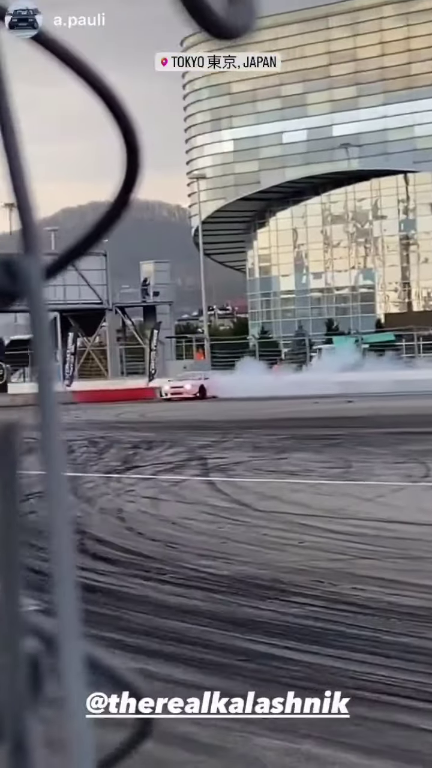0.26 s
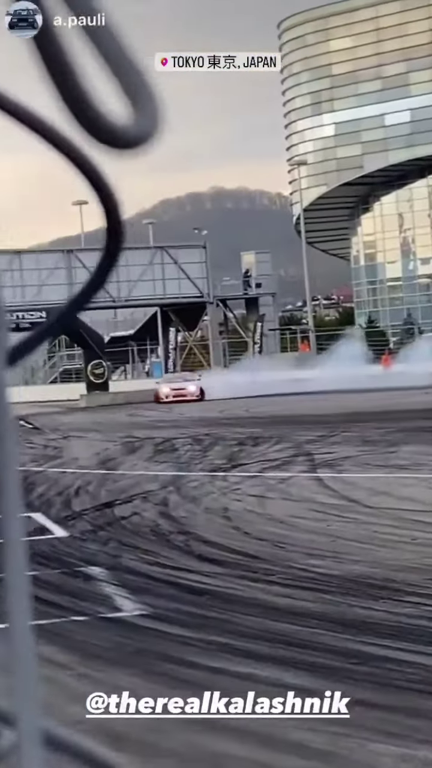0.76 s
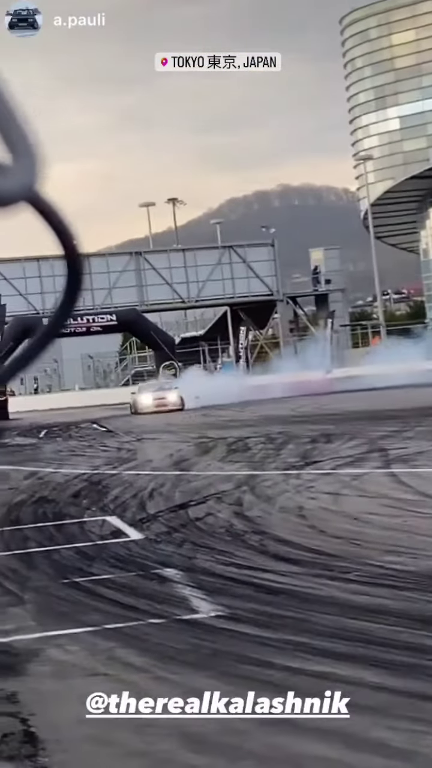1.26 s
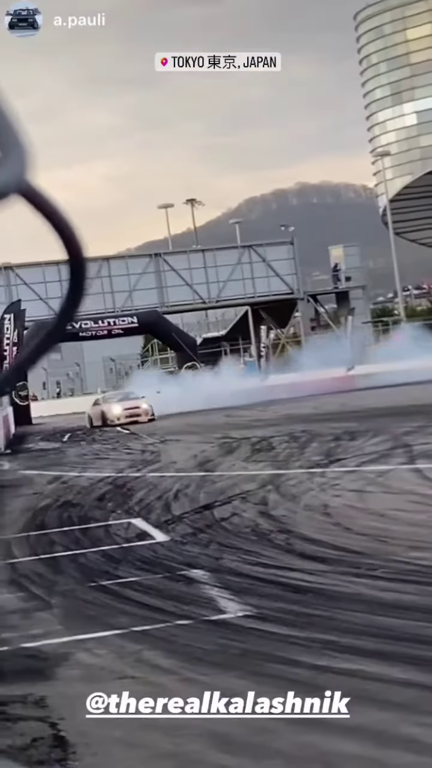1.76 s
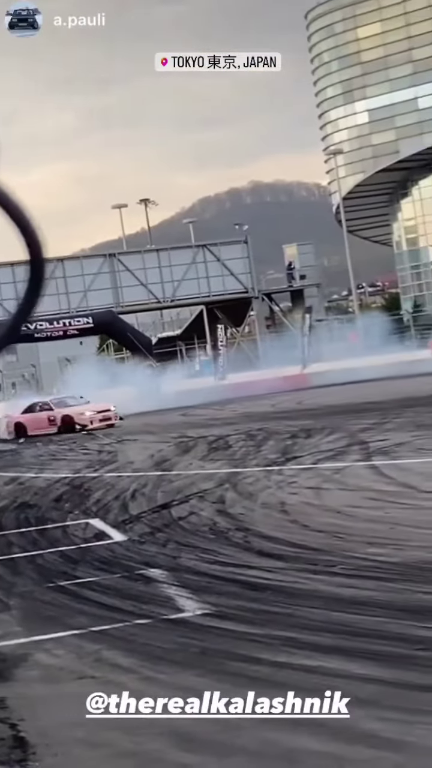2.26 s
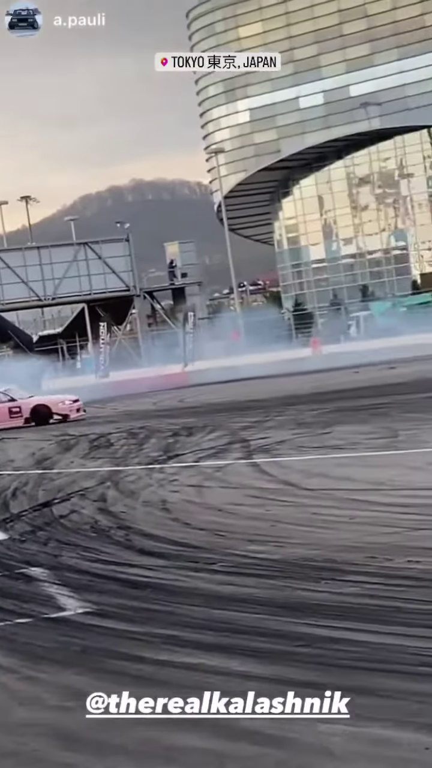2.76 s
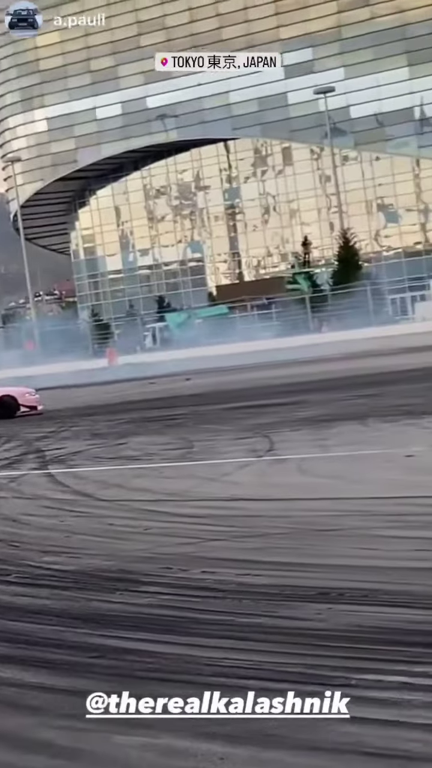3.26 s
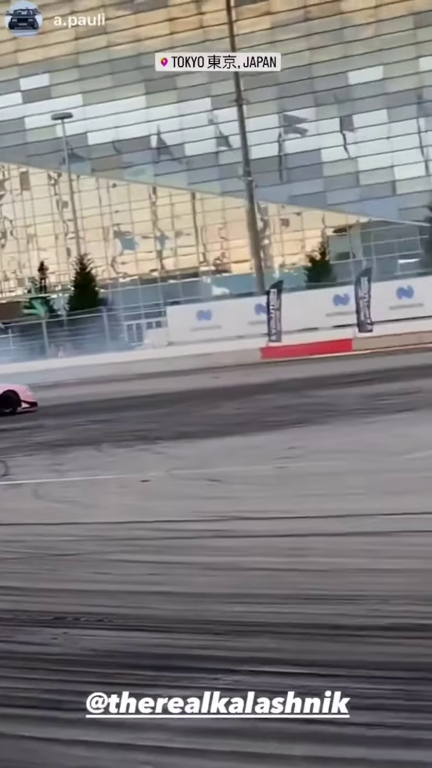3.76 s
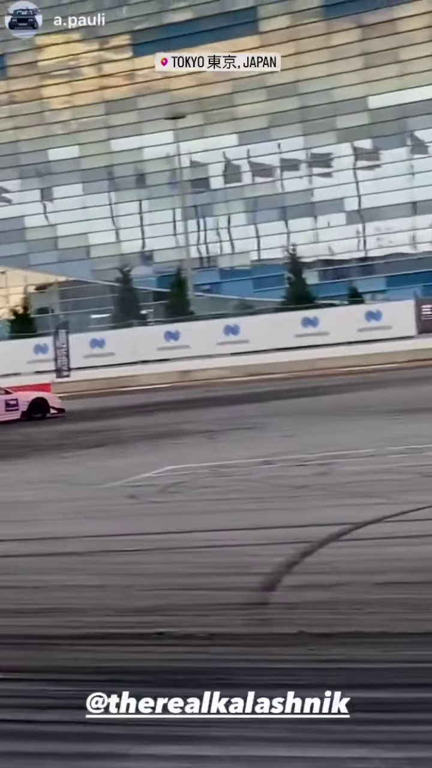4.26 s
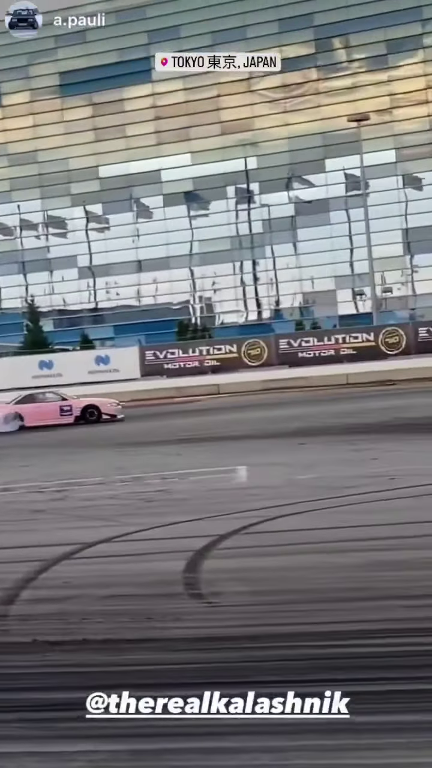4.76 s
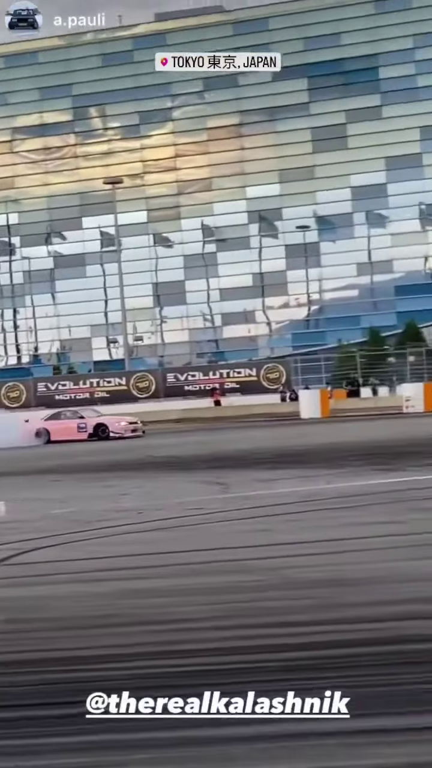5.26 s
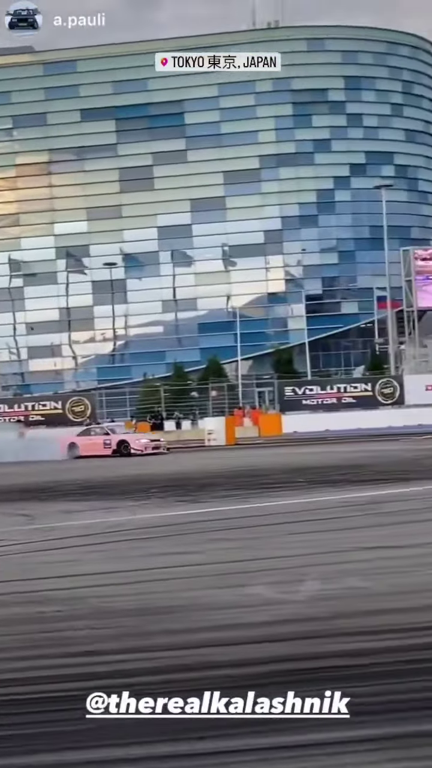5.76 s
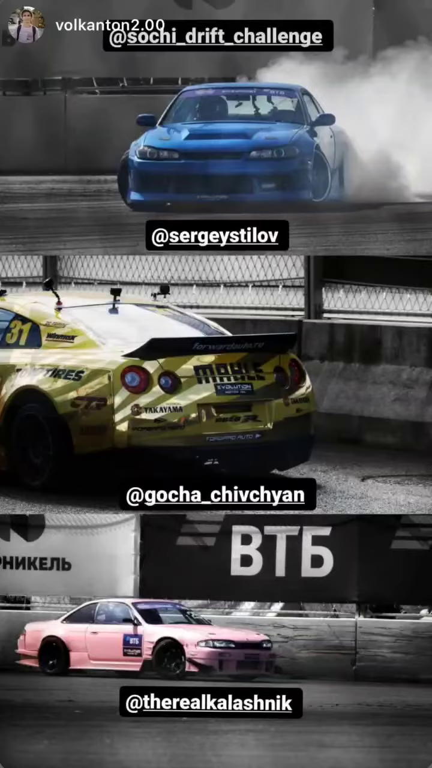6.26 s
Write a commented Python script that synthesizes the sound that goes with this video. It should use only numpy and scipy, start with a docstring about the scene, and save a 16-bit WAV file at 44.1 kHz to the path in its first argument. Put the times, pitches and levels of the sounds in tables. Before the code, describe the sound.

A four-cylinder drift car revs round a wide paved circuit, heard from the fence. From about 0.3 seconds the engine climbs, drops and blips in quick throttle stabs, its exhaust barking and rasping, with echoes returning from far walls. Tyres scrub throughout, and a rough squeal joins near 0.9 seconds. A longer rev from 1.5 seconds reaches its highest pitch around 2.3. The car grows louder, with bangs and backfire pops around 3 seconds, then pulls in a strong rising rev as the echoes fade. A quick cluster of pops comes at 4.1 seconds. At 4.6 there is a brief sharp tyre squeal and a bang, and the throttle lifts into low burbles. Revving resumes near 5 seconds, with raspy blips and bangs between 5.5 and 5.9. A last surge at 6 seconds stops dead at about 6.3.

```python
"""A four-cylinder drift car revs and slides round a wide paved circuit, heard from the fence.
Each firing rings the exhaust (low boom, mid bark) and pushes out rasping gas; ignition cuts bang,
backfires pop, a moving resonance howls. Tyres scrub and squeal. Two far walls send the revs back
late and lower in pitch as the paths grow. The sound stops dead near the end."""
import sys
import numpy as np
from scipy import signal
from scipy.fft import rfft, irfft, next_fast_len
from scipy.io import wavfile
from scipy.ndimage import uniform_filter1d, map_coordinates

SR = 44100
rng = np.random.default_rng(int(sys.argv[2]) if len(sys.argv) > 2 else 0)


def inscribe(sig):
    """Save sig as 16-bit PCM at rate SR to the path in sys.argv[1].

    A 1-D sig is mono; a 2-D sig holds one channel per row.
    Samples are clipped to [-1, 1] before scaling.
    """
    pcm = np.round(np.clip(np.atleast_2d(sig).T, -1, 1) * 32767)
    wavfile.write(sys.argv[1], SR, pcm.astype(np.int16))


N = 287973
TIME_S = np.arange(N) / SR

# tyres on tarmac (time [s], scrub [dB], squeal [dB])
TYRE_LEVELS = [(0, -26, -71), (.9, -24.5, -39), (1.3, -24, -39.5), (2.52, -22.5, -42.5), (3, -20.5, -49),
               (3.14, -18, -43), (4.2, -35.5, -35.5), (4.59, -30, -26), (4.64, -29.5, -39),
               (5.14, -31.5, -62), (5.6, -25, -41.5), (6.3, -28.5, -62)]
SCRUB_SPECTRUM = [(20, -43), (70, -9.5), (150, -6), (250, -1), (520, 1.5), (700, -2.5), (1350, -6),
                  (5200, -33), (7500, -76), (9500, -45), (14000, -70.5)]
# tyre squeal (frequency [Hz], relative gain [dB])
SQUEAL_SPECTRUM = [(1500, -28), (1850, -10), (1940, 0), (2070, 5), (2180, -8), (2470, -2), (2700, -8),
                   (3300, -30), (7000, -70)]
# echoes (initial delay [s], delay growth [s/s], gain [dB], fade start [s], fade [dB/s])
WALL_ECHOES = [(.07, .07, -0.5, 2.2, 21), (.24, .09, -7, 2.36, 30.5)]
# sound unrelated between the two microphone ports (frequency [Hz], gain [dB])
DIFFUSE_SPECTRUM = [(60, -30), (200, -34), (380, -18), (700, -12), (1300, -15), (2400, -11), (4400, -7),
                    (6000, 3), (15000, 5)]
# stereo width (time [s], side gain [dB])
STEREO_WIDTH = [(0, -5.5), (2.3, -4.5), (3.2, -9), (6.3, -12.5)]
# gusty air (time [s], band flicker [dB], pulse jitter [firing periods])
AIR_GUSTS = [(0, 3.5, .007), (2.6, 2.5, .005), (4.6, 3, .005), (4.9, 4.5, .01)]
# engine speed as heard (time [s], firing rate [Hz])
FIRING_RATE = [(0.1, 287),(0.3, 179.6), (0.37, 180.7), (0.52, 219.9), (0.75, 244.9), (0.83, 312.5),
               (0.94, 208), (1.17, 187.7), (1.38, 244.7), (1.46, 185.6), (1.6, 174.6), (1.67, 204.7),
               (2.09, 255.5), (2.18, 330.6), (2.3, 346.4), (2.37, 301.7), (2.48, 291.3), (2.58, 195.2),
               (2.77, 187.2), (2.82, 234.8), (2.89, 233.8), (3.01, 319.6), (3.15, 184.8), (3.3, 190.4),
               (3.45, 227.4), (3.72, 252.6), (4.1, 285.5), (4.18, 258.8), (4.3, 268.5), (4.55, 276),
               (4.62, 289.2), (4.76, 260), (5.23, 232.1), (5.33, 260.2), (5.39, 290.4), (5.46, 249),
               (5.87, 279.7), (5.98, 250.3), (6.1, 217.8), (6.26, 238)]
# stabs (open [s], shut [s], boom at open [dB], boom at shut [dB], bark [dB], rasp [dB])
# bark and rasp are relative to the boom, at full boost
THROTTLE_STABS = [(0.0, 0.04, -46, -36, -14, -20), (0.285, 0.786, -22.5, -19.5, -0.5, -11),
                  (1.031, 1.062, -21.5, -23.5, 6, 6), (1.093, 1.256, -35, -31.5, 9.5, -2),
                  (1.259, 1.491, -35.5, -35, 6, -2.5), (1.542, 2.162, -23, -20, -0.5, -10),
                  (2.178, 2.481, -19.5, -27.5, -9.5, -13), (2.547, 2.854, -22, -13.5, -16, -18.5),
                  (2.959, 3.003, -16, -15, -9.5, -8.5), (3.142, 4.119, -12, -20, -4.5, -10),
                  (4.128, 4.597, -19.5, -23, -4, -11), (4.958, 5.405, -29, -23.5, -14.5, -17.5),
                  (5.443, 5.526, -27, -28, -0.5, -6.5), (5.643, 5.675, -26, -25, 9.5, 5),
                  (5.775, 5.815, -32.5, -34, -7.5, 12), (5.979, 6.295, -21, -15.5, -3.5, -2)]
# cylinders in firing order (strength [dB])
CYLINDER_DB = [0.74, -0.92, 0.5, 0.44]
# strong and weak firings alternate, adding notes between overtones (time [s], swing [+/- dB])
FIRING_IMBALANCE = [(.4, .5), (.55, 2.5), (.82, 3.5), (1, 0.5), (1.7, 0), (2.05, 1.5), (2.3, 0.5),
                    (2.87, 1.5), (3.4, -0.6), (3.6, 3.5), (3.75, 1), (4.6, .5), (5.5, 2), (6, 0)]
# tailpipe swings to the listener (time [s], half width [s], bark and rasp lift [dB])
TAILPIPE_SWINGS = [(2.52, 0.023, 15), (3.51, 0.054, 4), (3.677, 0.071, 6), (6.092, 0.12, 5)]
# short low exhaust burbles, on or off throttle (time [s], half width [s], boom lift [dB])
BOOM_BURBLES = [(.83, 0.02, 2.5), (2.905, 0.011, 4.5), (4.645, .018, 5), (4.7, .012, 8), (4.742, .012, 9.5),
                (4.815, 0.011, 10.5), (5.03, 0.018, 5), (5.21, 0.029, 6.5)]
# moving resonance (time [s], centre [Hz], level [dB])
HOWL_PATH = [(.3, 1210, -47.5), (.46, 1290, -23), (.62, 900, -51), (.75, 707, -16.5), (.8, 750, -49),
             (1.18, 957, -24), (1.28, 800, -48), (1.55, 800, -39), (1.66, 737, -23), (3.05, 793, -35.5),
             (3.3, 1296, -22), (3.52, 973, -21), (3.9, 1207, -43), (4.58, 2105, -23.5), (4.63, 1970, -60),
             (5.2, 949.7, -66), (5.28, 1040, -32.5), (5.92, 800, -52), (6.02, 720, -24), (6.3, 1000, -33)]
# bangs and pops (time [s], gain [dB])
IGNITION_CUTS = [(2.853, -20), (3.02, -23), (4.101, -15), (4.603, -24), (5.489, -17), (5.667, -20),
                 (5.879, -16)]
BACKFIRES = [(3.014, -9.5), (3.104, -19), (4.105, -14), (4.118, -14), (4.131, -13.5)]
RASP_SPECTRUM = [(700, -11.5), (1500, 2), (2500, 2), (4000, -1), (5800, -7), (7500, -28), (9300, -16),
                 (12000, -26), (14000, -42)]
# pipe boom, bark, bang and pop (frequency [Hz], relative gain [dB])
BOOM_SPECTRUM = [(60, -34.5), (130, -7.5), (190, 3.5), (380, 6.5), (560, -2), (800, -39), (4000, -74)]
BARK_SPECTRUM = [(350, -29.5), (600, 2), (1000, 0.5), (1300, 0), (1650, -5), (2000, -7), (2700, -6),
                 (3500, -13), (5000, -30), (9000, -65)]
BANG_SPECTRUM = [(30, -59), (70, 9.5), (150, 1.5), (400, -3), (1200, -11), (3500, -22), (12000, -68.5)]
POP_SPECTRUM = [(60, -5), (350, 5), (1300, 1.5), (3000, -18.5), (12000, -71)]

COAST_BOOM_DB, COAST_BARK_DB, COAST_RASP_DB = -33.5, -56.5, -49
SWELL_DB_PER_S, BOOM_FADE_DB_PER_S, BARK_RASP_FADE_DB_PER_S = 204, 64, 195
ROUGH_OPEN, ROUGH_SHUT, ROUGH_CUT = .07, .2, .15
CUT_S, CUT_DROP_CHANCE = .045, .55


def undb(db):
    return 10 ** (np.asarray(db) / 20)


def unit_rms(x):
    return x / np.sqrt(np.mean(x ** 2))


def curves(table):
    """Table columns interpolated per sample."""
    times_s, *columns = np.transpose(table)
    return [np.interp(TIME_S, times_s, column) for column in columns]


def swells_db(table):
    """Sum of bell-shaped lifts."""
    return sum(db * np.exp(-((TIME_S - at_s) / half_s) ** 2) for at_s, half_s, db in table)


def colour(x, spectrum, size=4096):
    """Minimum-phase filter, by folded cepstrum."""
    hz, db = np.transpose(spectrum)
    grid_hz = np.maximum(np.arange(size // 2 + 1), 1) * SR / size
    cepstrum = irfft(np.interp(np.log(grid_hz), np.log(hz), db) * np.log(10) / 20)
    cepstrum[1:size // 2] *= 2
    cepstrum[size // 2 + 1:] = 0
    return signal.fftconvolve(x, irfft(np.exp(rfft(cepstrum))))[:N]


def lag(x, tau_s):
    """One-pole low-pass."""
    pole = np.exp(-1 / (tau_s * SR))
    return signal.lfilter([1 - pole], [1, -pole], x)


def delay(x, delay_s):
    """Time-varying delay."""
    return map_coordinates(x, [(TIME_S - delay_s) * SR], order=1, mode="mirror")


def wander(rate_hz):
    """Smooth random drift, rms 1."""
    hold = int(SR / rate_hz)
    steps = np.repeat(rng.standard_normal(N // hold + 1), hold)
    return unit_rms(uniform_filter1d(uniform_filter1d(steps, hold), hold)[:N])


def reverb(x, t60_s):
    """Scattered reflections: decaying noise response, energy 1."""
    response = rng.standard_normal(SR) * 1000. ** (-np.arange(SR) / SR / t60_s)
    return signal.fftconvolve(x, response / np.linalg.norm(response))[:N]


def wall_echoes(car, floor_db=-21):
    """Dull copies; growing delay lowers the pitch, and they fade as the car comes round."""
    dull = colour(car, [(1000, -2.0), (3000, -4.5), (9000, -8.5)])
    echoes = np.zeros(N)
    for delay_s, growth, db, fade_from_s, fade_db_per_s in WALL_ECHOES:
        faded_db = db - fade_db_per_s * np.maximum(TIME_S - fade_from_s, 0)
        echoes += undb(np.maximum(faded_db, floor_db)) * delay(dull, delay_s + growth * TIME_S)
    return echoes


def tyres():
    """Broad scrub and rough stick-slip squeal, both flickering noise."""
    def flicker(spectrum, depth_db, rate_hz):
        return colour(rng.standard_normal(N), spectrum) * undb(depth_db * wander(rate_hz))

    scrub_db, squeal_db = curves(TYRE_LEVELS)
    scrub = flicker(SCRUB_SPECTRUM, 2.3, 7) + flicker(SCRUB_SPECTRUM, 2.3, 19)
    squeal = flicker(SQUEAL_SPECTRUM, 2.0, 30)
    return undb(scrub_db) * unit_rms(scrub) + undb(squeal_db) * unit_rms(squeal)


def gusty_air(x, base_hz=400):
    """Overtones come and go: each third octave above the base has its own wandering gain."""
    size = next_fast_len(N)
    spectrum = rfft(x, size)
    hz = np.maximum(np.arange(len(spectrum)), 1) * SR / size
    thirds = np.clip(3 * np.log2(hz / base_hz), 0, 11)
    depth_db = curves(AIR_GUSTS)[0]
    bands = (irfft(spectrum * np.maximum(1 - abs(thirds - k), 0), size)[:N] for k in range(12))
    return sum(band * undb(min(k / 2, 1) * depth_db * wander(16)) for k, band in enumerate(bands))


def backfires(decay_s=.0043):
    """Short noise puffs rung through the pipe."""
    puffs = sum(undb(db) * (TIME_S >= at_s) * np.exp(-np.maximum(TIME_S - at_s, 0) / decay_s)
                for at_s, db in BACKFIRES)
    noise = rng.standard_normal(N)
    return colour(puffs * noise, POP_SPECTRUM) / np.std(colour(noise, POP_SPECTRUM))


def cut_bangs():
    """Unburnt fuel bangs at each ignition cut."""
    envelope = np.zeros(N)
    for at_s, db in IGNITION_CUTS:
        age = np.maximum(TIME_S - at_s, 0) / CUT_S
        envelope += undb(db) * age * np.exp(1 - 2.98 * age)
    return envelope * unit_rms(colour(rng.standard_normal(N), BANG_SPECTRUM))


def howl(pulses, stage_width_hz=285):
    """Moving resonance picks out overtones: shift to 0 Hz, low-pass twice, shift back."""
    centre_hz, level_db = curves(HOWL_PATH)
    carrier = np.exp(2j * np.pi * np.cumsum(centre_hz) / SR)
    tau_s = 1 / (np.pi * stage_width_hz)
    baseband = lag(lag(pulses / carrier, tau_s), tau_s)
    return undb(level_db) * unit_rms(np.real(carrier * baseband))


def second_path(x, delay_s=.001196, drift_s=.00046, gain_db=-3):
    """A late copy with drifting lag: overtones swell and fade in turn."""
    return x + undb(gain_db) * delay(x, delay_s + drift_s * wander(9))


def pipe_smear(x, centre_hz, width_hz):
    """All-pass: the pipe holds back sound near a resonance, drawing each pulse out."""
    radius = np.exp(-np.pi * width_hz / SR)
    denominator = [1, -2 * radius * np.cos(2 * np.pi * centre_hz / SR), radius * radius]
    return signal.lfilter(denominator[::-1], denominator, x)


def throttle_levels_db(boost_lag_s=.16, boost_db=25):
    """Stabs swell and fade over the coasting levels; lagging boost lifts bark and rasp."""
    pedal = sum((TIME_S >= open_s) & (TIME_S < shut_s) for open_s, shut_s, *_ in THROTTLE_STABS) * 1.
    spool_db = boost_db * (lag(pedal, boost_lag_s) - 1)
    facing_db = swells_db(TAILPIPE_SWINGS)
    boom_db, bark_db, rasp_db = COAST_BOOM_DB, COAST_BARK_DB, COAST_RASP_DB
    for open_s, shut_s, open_db, shut_db, bark_rel_db, rasp_rel_db in THROTTLE_STABS:
        before_s, after_s = np.maximum(open_s - TIME_S, 0), np.maximum(TIME_S - shut_s, 0)
        stab_db = np.interp(TIME_S, [open_s, shut_s], [open_db, shut_db]) - SWELL_DB_PER_S * before_s
        boom_db = np.maximum(boom_db, stab_db - BOOM_FADE_DB_PER_S * after_s)
        bright_db = stab_db - BARK_RASP_FADE_DB_PER_S * after_s + facing_db + spool_db
        bark_db = np.maximum(bark_db, bright_db + bark_rel_db)
        rasp_db = np.maximum(rasp_db, bright_db + rasp_rel_db)
    return boom_db + swells_db(BOOM_BURBLES), bark_db, rasp_db


def burn_roughness(settle_s=.07, min_hold_s=.1):
    """Burning is even on held throttle, uneven in blips and on the overrun."""
    held = [np.clip(1 - np.maximum(open_s - TIME_S, TIME_S - shut_s) / settle_s, 0, 1)
            for open_s, shut_s, *_ in THROTTLE_STABS if shut_s - open_s > min_hold_s]
    return ROUGH_SHUT + (ROUGH_OPEN - ROUGH_SHUT) * np.max(held, axis=0)


def firings(rev_wobble=.005):
    """One pulse a firing; roughness scatters size and timing, cuts drop firings."""
    rate_hz = curves(FIRING_RATE)[0] * (1 + rev_wobble * wander(14))
    cutting = sum((TIME_S > at_s) & (TIME_S < at_s + CUT_S) for at_s, _ in IGNITION_CUTS)
    rough = np.maximum(burn_roughness(), ROUGH_CUT * cutting)
    phase = np.cumsum(rate_hz) / SR
    position = np.interp(np.arange(1, int(phase[-1])), phase, np.arange(N))
    count, sample = len(position), position.astype(int)
    fires = rng.random(N // 100)[:count] > CUT_DROP_CHANCE * cutting[sample]
    size_noise, time_noise = rng.standard_normal((N // 100, 2))[:count].T
    imbalance_db = np.resize([1, -1], count) * curves(FIRING_IMBALANCE)[0][sample]
    size = fires * undb(np.resize(CYLINDER_DB, count) + imbalance_db + 8 * rough[sample] * size_noise)
    jitter_periods = curves(AIR_GUSTS)[1] + .12 * (rough - ROUGH_OPEN)
    position = np.clip(position + jitter_periods[sample] * time_noise * SR / rate_hz[sample], 0, N - 2)
    sample, fraction = position.astype(int), position % 1
    pulses = np.bincount(sample, size * (1 - fraction), N) + np.bincount(sample + 1, size * fraction, N)
    return pulses * np.sqrt(SR / rate_hz)


def engine():
    """Each firing booms and barks in the pipe; a puff of rasping gas follows."""
    boom_db, bark_db, rasp_db = throttle_levels_db()
    pulses = firings()
    gas_flow = 1 + unit_rms(lag(pulses, tau_s=.0057))
    rasp = undb(rasp_db) * unit_rms(colour(gas_flow * rng.standard_normal(N), RASP_SPECTRUM))
    boom = undb(boom_db) * unit_rms(colour(pulses, BOOM_SPECTRUM))
    bark = undb(bark_db) * unit_rms(second_path(colour(pulses, BARK_SPECTRUM)))
    bangs = cut_bangs() + backfires()
    pipe = pipe_smear(boom - bark, centre_hz=499, width_hz=240)
    pipe = pipe_smear(pipe, centre_hz=1118, width_hz=620)
    return gusty_air(pipe) + howl(pulses) + rasp + bangs


def scene():
    """Car, echoes, arena reverb and tyres in mid/side stereo; middle tones lean left."""
    car = engine()
    mid = car + wall_echoes(car) + undb(-16) * reverb(car, t60_s=1.2) + tyres()
    lean_band = signal.butter(1, (330, 1500), "bandpass", fs=SR, output="sos")
    lean = undb(-15) * signal.sosfiltfilt(lean_band, mid)
    diffuse = colour(reverb(mid, t60_s=.15), DIFFUSE_SPECTRUM)
    side = undb(curves(STEREO_WIDTH)[0]) * (diffuse + lean)
    return np.array([mid + side, mid - side])


def record(dry):
    """The phone rounds the loudest peaks; the sound stops dead; the top is cut."""
    stop_s, fade_s, top_hz = 6.266, .015, 15600
    gate = np.clip((stop_s - TIME_S) / fade_s, 0, 1)
    rounded = np.tanh(.63 * dry) / .7
    return signal.sosfilt(signal.ellip(12, .2, 70, top_hz, fs=SR, output="sos"), gate * rounded)


dry = scene()
out = record(dry)
inscribe(out)
```